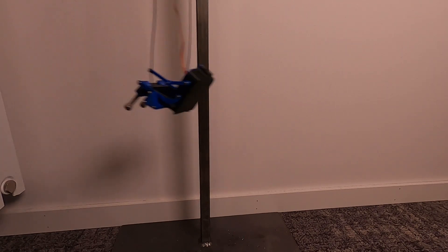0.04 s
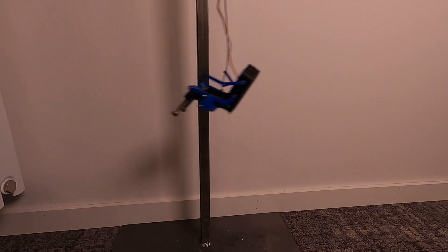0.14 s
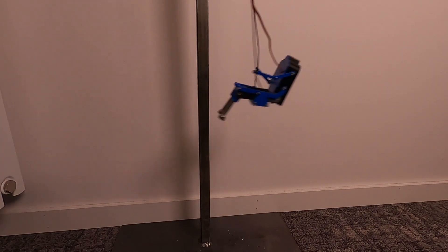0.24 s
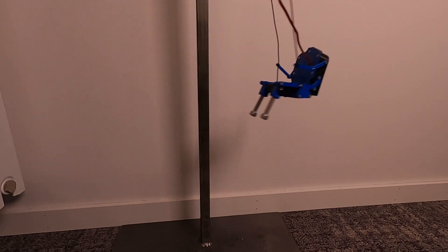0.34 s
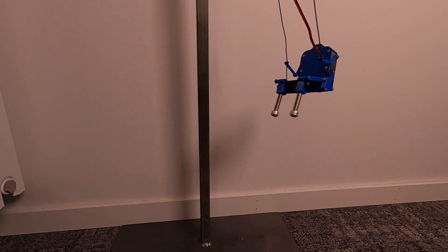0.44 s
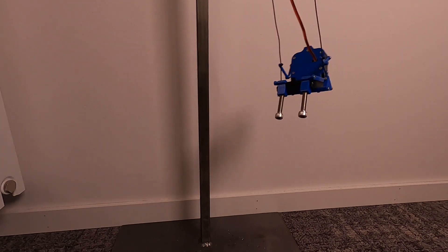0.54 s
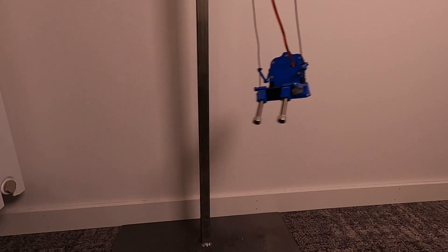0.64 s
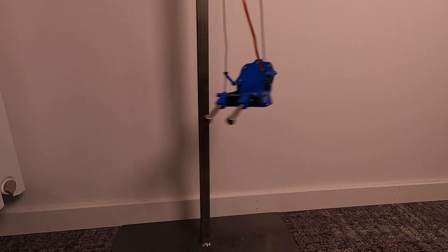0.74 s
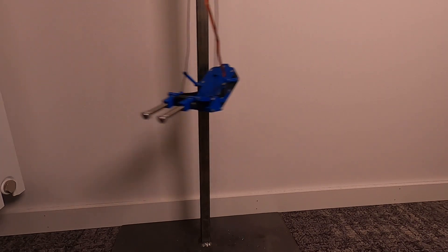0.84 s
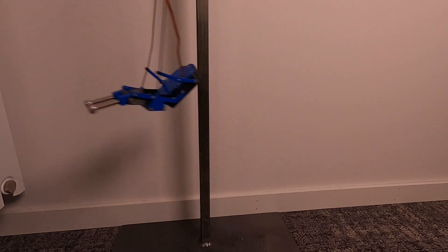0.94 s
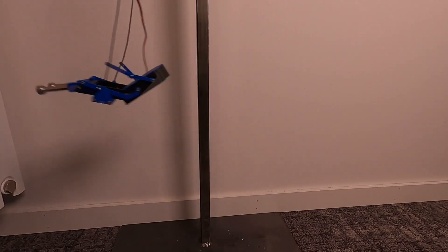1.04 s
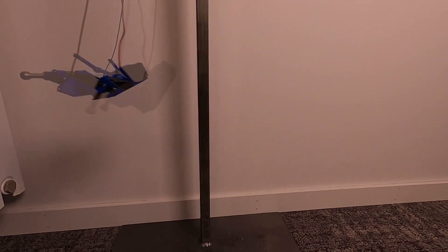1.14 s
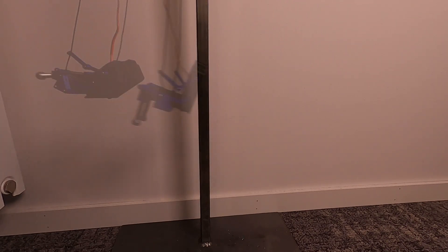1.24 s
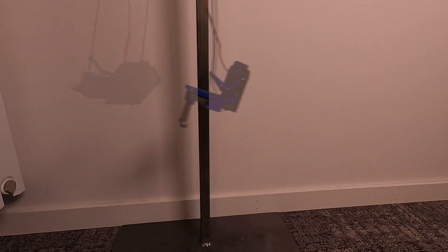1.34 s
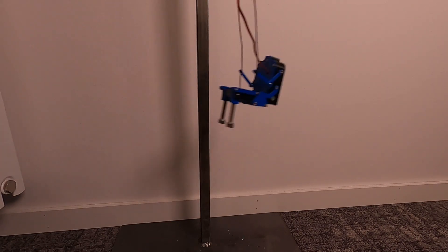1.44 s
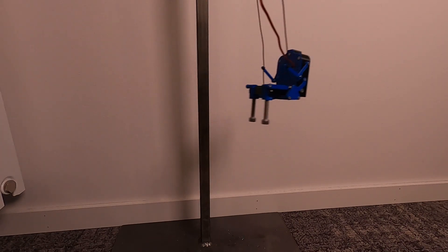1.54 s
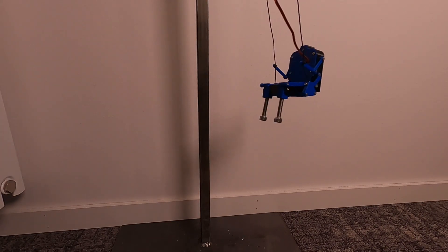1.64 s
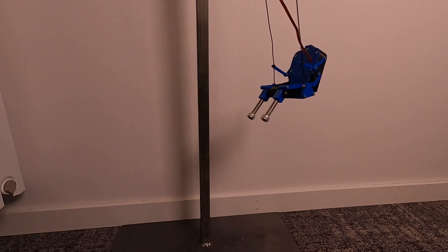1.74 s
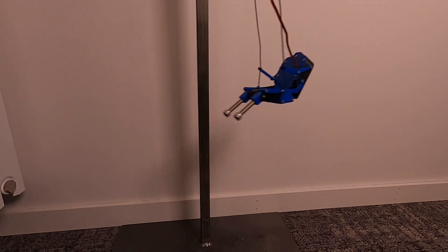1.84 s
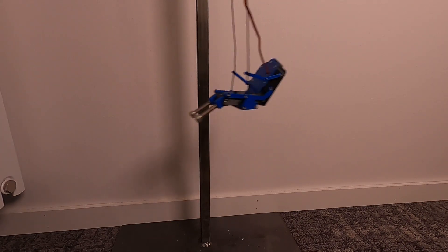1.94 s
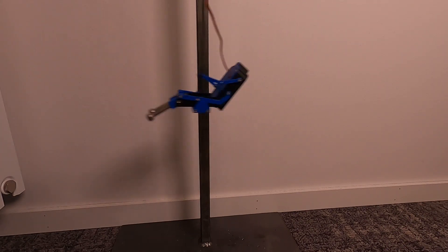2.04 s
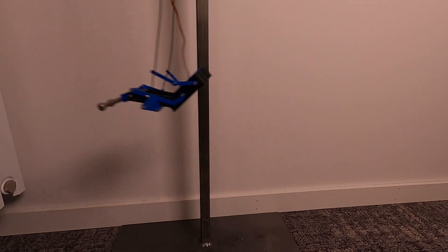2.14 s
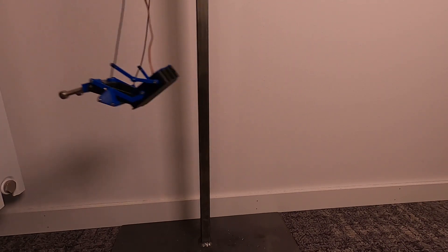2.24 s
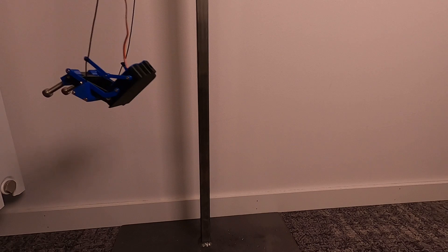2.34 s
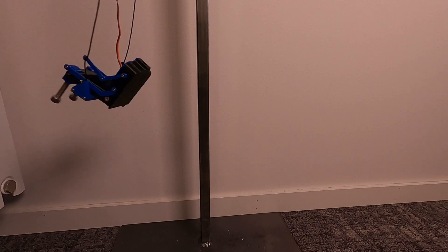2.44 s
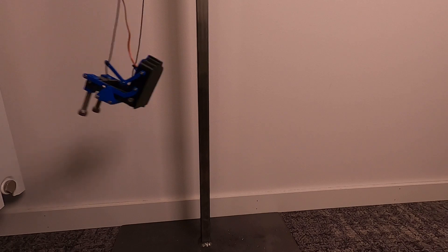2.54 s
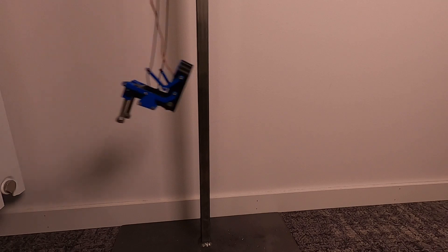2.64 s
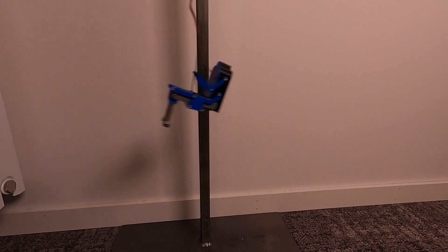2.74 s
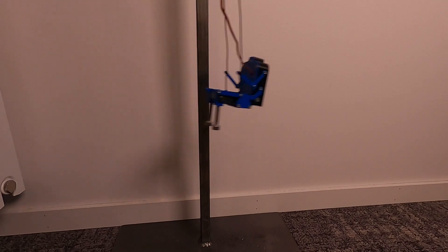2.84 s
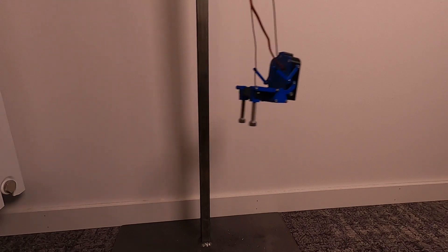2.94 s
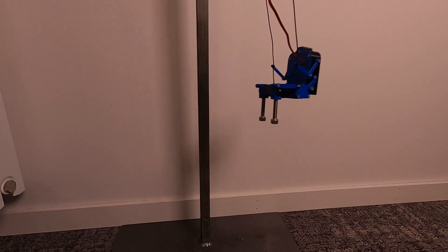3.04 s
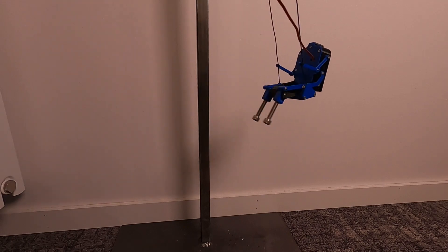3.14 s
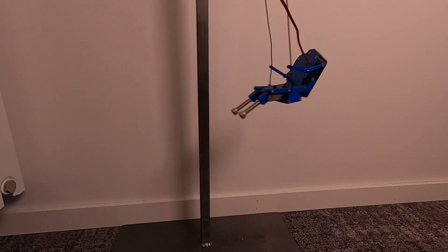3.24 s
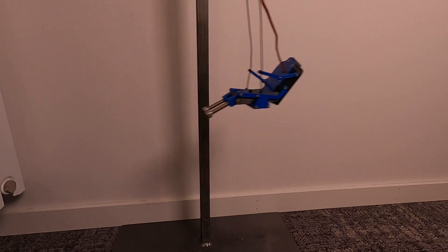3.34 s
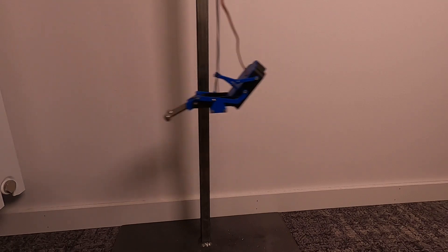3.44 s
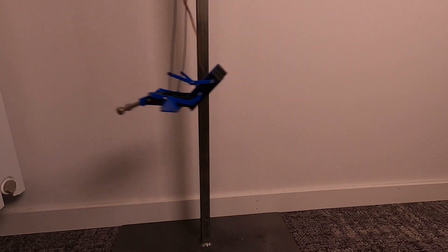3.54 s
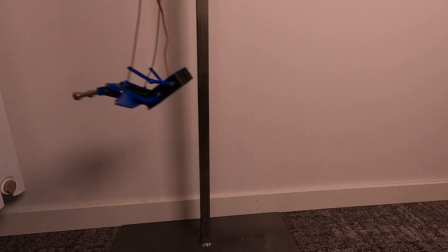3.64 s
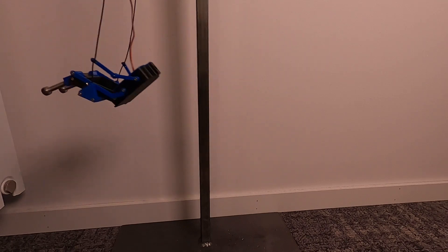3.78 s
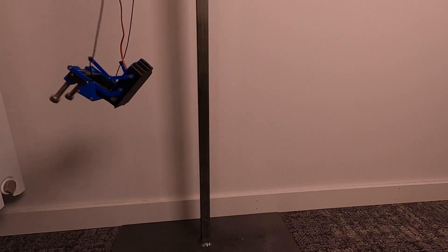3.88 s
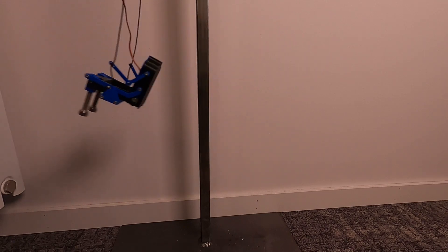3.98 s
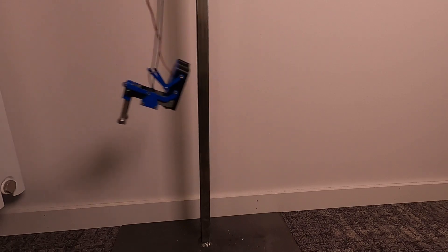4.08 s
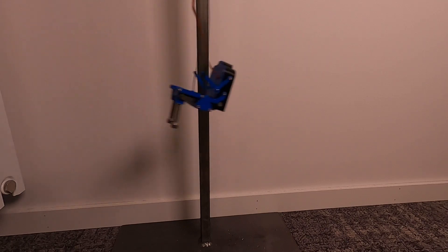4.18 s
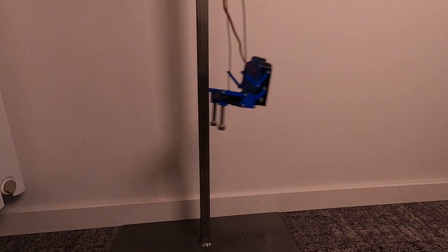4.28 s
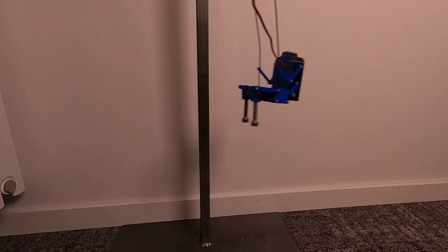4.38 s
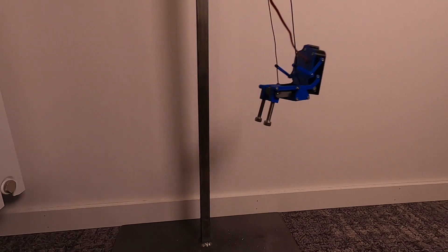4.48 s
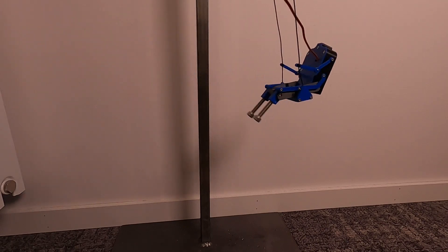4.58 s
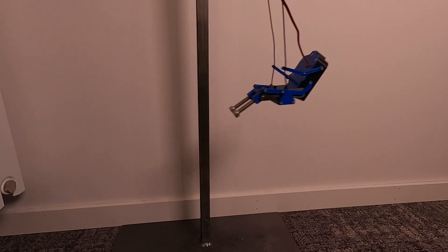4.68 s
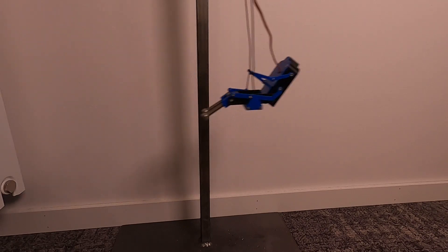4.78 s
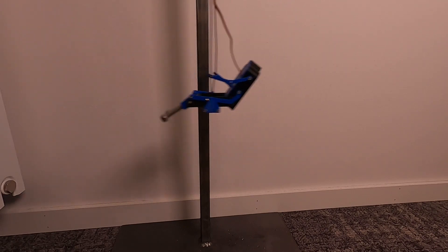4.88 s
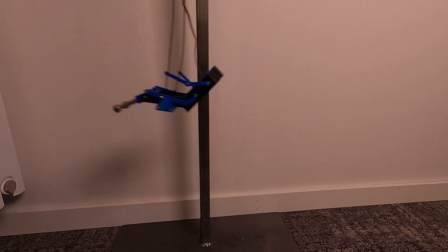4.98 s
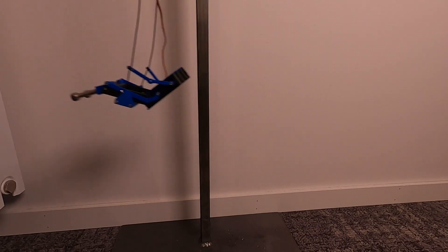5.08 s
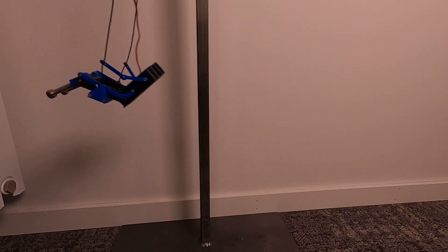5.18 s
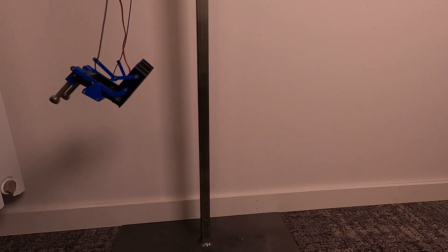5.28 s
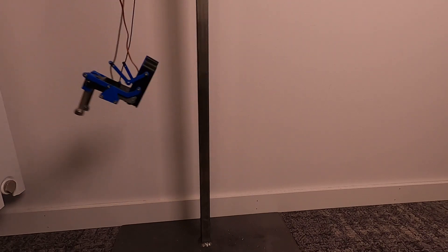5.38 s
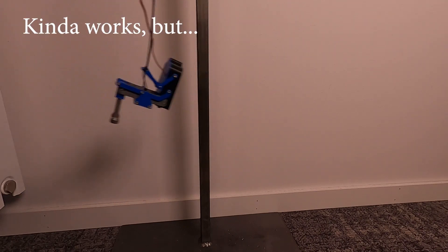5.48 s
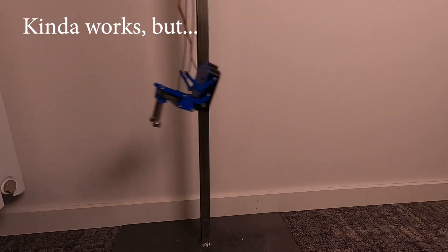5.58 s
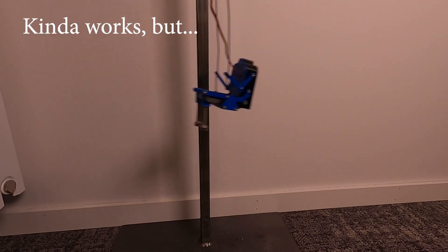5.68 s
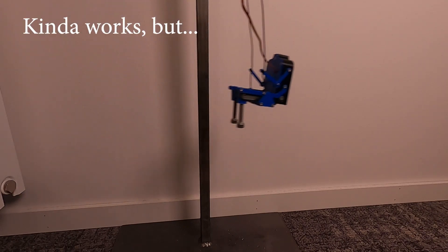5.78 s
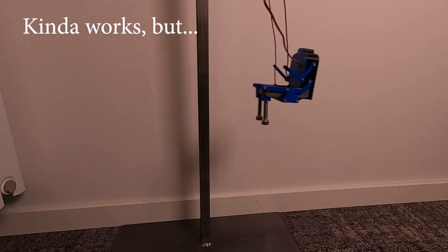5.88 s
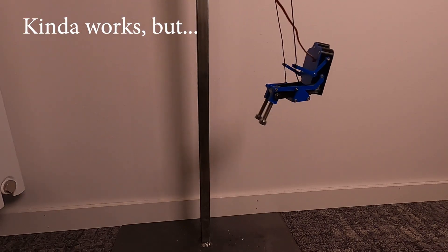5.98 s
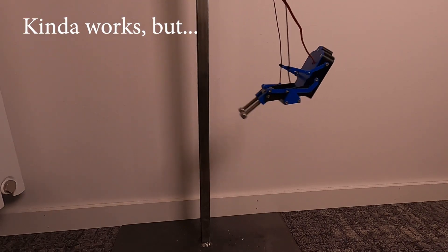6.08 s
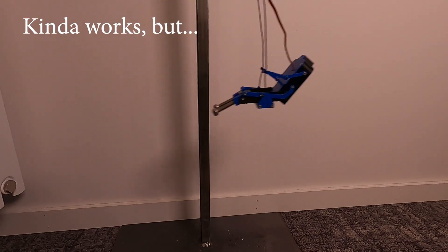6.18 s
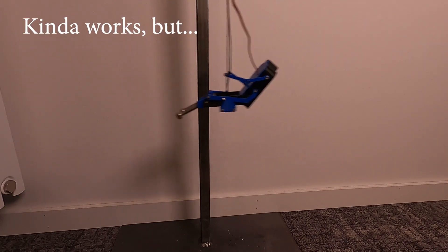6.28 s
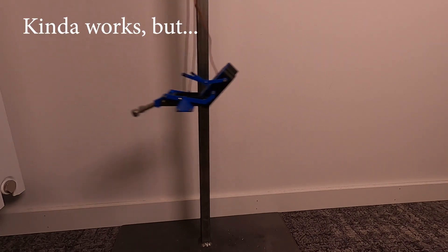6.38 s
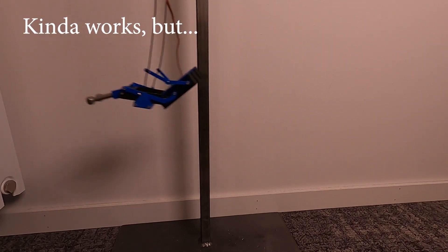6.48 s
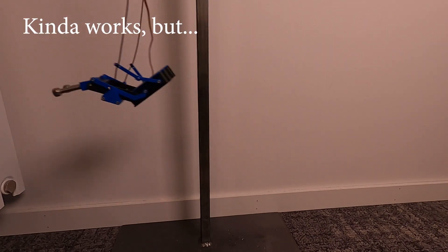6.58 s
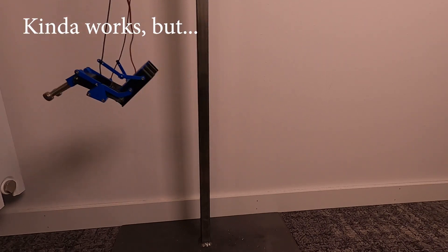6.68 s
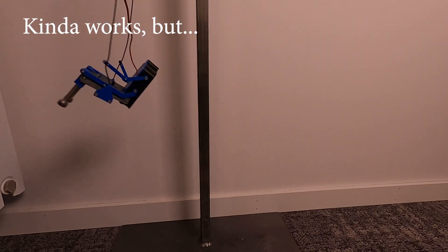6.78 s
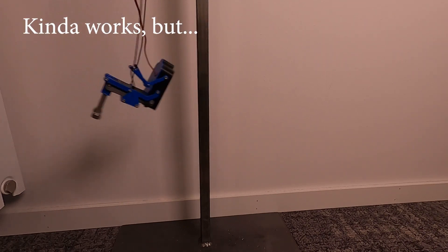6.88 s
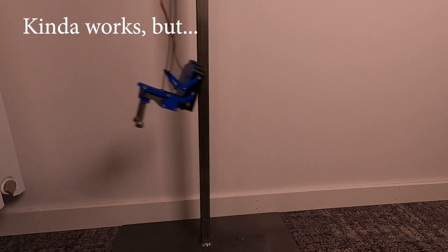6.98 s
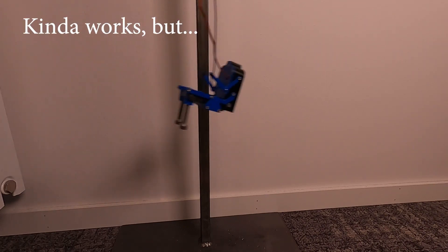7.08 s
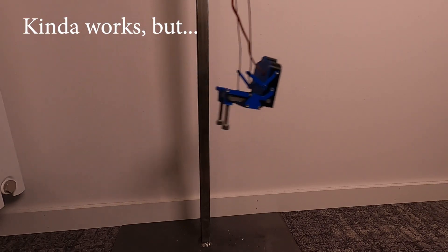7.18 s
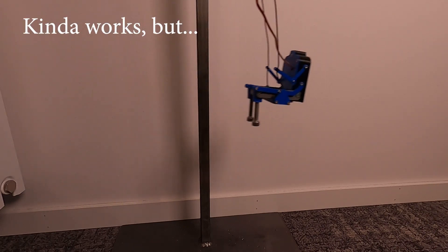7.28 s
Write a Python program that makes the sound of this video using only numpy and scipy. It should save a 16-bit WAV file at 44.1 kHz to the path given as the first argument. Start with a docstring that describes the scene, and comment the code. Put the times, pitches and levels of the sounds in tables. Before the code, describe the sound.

In a quiet room with bare walls, a small geared motor rasps briefly back and forth. Lower, growling strokes alternate with brighter, slightly louder ones, each led by a few sharp kicks. Early pauses hold single clicks; later ones mosthold dry ticking at fifty a second. Faint bass murmur, a few dull booms and soft hiss sit underneath, heard closely in stereo with little reverberation.

```python
"""Short gear rattles, flurries of ticks and single snaps in a quiet room, over low rumble and swelling hiss.
A hobby servo leans a small plastic robot back and sits it up again on a string swing.
Strokes are trains of tooth contacts ringing in the case; in stretches of holding, a kick each 20 ms frame ticks.
Rumble, hum, hiss and room tone are filtered noise; booms and frame knocks are shaped low sines."""
import sys
import numpy as np
from scipy import signal
from scipy.fft import rfft, irfft
from scipy.io import wavfile
from scipy.ndimage import uniform_filter1d

SR = 44100
rng = np.random.default_rng(int(sys.argv[2]) if len(sys.argv) > 2 else 0)


def wav_record(signal):
    """Record a signal, one row per channel, as 16-bit PCM in the file named by sys.argv[1]."""
    frames = np.transpose(np.atleast_2d(signal))
    bounded = np.clip(frames, -1, 1)
    # unit amplitude maps onto the largest positive 16-bit level
    quanta = np.round(bounded * 32767).astype(np.int16)
    wavfile.write(sys.argv[1], SR, quanta)


N = 322812
TIME = np.arange(N) / SR
FRAME_S = .02002   # spacing of the servo's control pulses

# colour of one kick in the gears, before the case resonances and bass cut: (f/Hz, relative level/dB)
TICK_COLOUR = [(600, -31), (1100, -21), (1400, -4.5), (1780, 1), (2300, -14.5), (2750, -10.5), (3400, -7.5),
               (4200, -9.5), (5000, -4), (5900, -12), (7000, -16), (8400, -10.5), (11000, -28),
               (15500, -42)]


def from_db(db):
    """Amplitude factor of a level in dB."""
    return 10 ** (np.asarray(db) / 20)


def rms_one(x):
    """Scale a sound to an RMS of 1."""
    return x / np.sqrt(np.mean(x ** 2) + 1e-20)


def at_hz(points, hz):
    """Read a curve of (f/Hz, value) along a logarithmic frequency axis."""
    points = np.array(points)
    return np.interp(np.log(hz + 1), np.log(points[:, 0]), points[:, 1])


def butter(x, edge_hz, kind, order=2):
    """Butterworth filter."""
    sos = signal.butter(order, edge_hz, kind, fs=SR, output="sos")
    return signal.sosfilt(sos, x)


def band(x, centre_hz, width_hz, order=2):
    """Keep a band around a centre frequency."""
    return butter(x, [centre_hz - width_hz / 2, centre_hz + width_hz / 2], "band", order)


def add(out, start_s, sound):
    """Mix a sound into every channel at its time."""
    at = max(0, round(start_s * SR))
    out[:, at:at + sound.shape[1]] += sound[:, :N - at]


def drift(t, rate):
    """Random wander around 0: straight lines between normal draws, `rate` of them a second."""
    knots = np.arange(t[0], t[-1] + 2 / rate, 1 / rate)
    return np.interp(t, knots, rng.standard_normal(len(knots)))


def swells(rows):
    """Gain that rises and falls in a bell around each row's time."""
    return sum(from_db(db) * np.exp(-((TIME - s) / half_s) ** 2) for s, db, half_s in rows)


def air(colour):
    """Steady stereo noise of RMS 1, whose likeness between the ears depends on frequency."""
    # likeness of the background in both ears: (f/Hz, likeness/0-1)
    likeness = [(60, 0.82), (150, 0.79), (300, 0.2), (700, 0.07), (2000, 0.54), (6000, 0), (14000, 0)]
    hz = np.fft.rfftfreq(N, 1 / SR)
    mid, side = rfft(rng.standard_normal((2, N))) * from_db(at_hz(colour, hz))
    alike = at_hz(likeness, hz)
    spectrum = np.sqrt(1 + alike) * mid + np.sqrt(1 - alike) * side * [[1], [-1]]
    return rms_one(irfft(spectrum, N))


def room_tone(level_db=-64.5):
    """Steady background noise of the room, weighted to the bass."""
    # spectrum of the room tone: (f/Hz, relative density/dB per Hz)
    tone_colour = [(15, -17), (30, -8), (50, -20.5), (105, -17.5), (165, -14), (230, -24), (420, -25.5),
                   (550, -31.5), (850, -37.5), (1200, -32.5), (1900, -32.5), (2400, -41.5), (7000, -53),
                   (15000, -78)]
    return from_db(level_db) * air(tone_colour)


def hum(hz=397, width_hz=25, level_db=-82):
    """A faint wavering hum: a narrow band of noise, independent in each ear."""
    noise = rng.standard_normal((2, N))
    return from_db(level_db) * rms_one(band(noise, hz, width_hz))


def rumble(hz=68, width_hz=30, gain_db=1, boom_hz=66, uneven_db=3, uneven_per_s=14):
    """A low resonance of the room murmurs unevenly as narrow noise and now and then booms as a wavering sine."""
    # murmur level before gain and unevenness: (t/s, level/dB)
    murmur_levels = [(0, -76), (1.9, -72), (2.6, -63), (4.2, -67), (5.8, -64.5), (7.3, -67)]
    # soft low booms: (peak t/s, peak level/dB, half length to 1/e /s)
    boom_rows = [(0.349, -48, 0.015), (1.561, -46.5, 0.021), (2.431, -49, 0.028), (2.833, -44, 0.011),
                 (2.893, -41, 0.036), (3.014, -48.5, 0.02)]
    murmur = rms_one(band(rng.standard_normal(N), hz, width_hz))
    murmur_db = np.interp(TIME, *np.transpose(murmur_levels)) + gain_db + uneven_db * drift(TIME, uneven_per_s)
    boom_pitch = boom_hz * (1 + 0.029 * drift(TIME, 11))
    booms = swells(boom_rows) * np.sin(2 * np.pi * np.cumsum(boom_pitch) / SR)
    return murmur * from_db(murmur_db) + booms


def hiss():
    """Soft coloured noise that swells and fades."""
    # colour of the hiss: (f/Hz, relative level/dB)
    hiss_colour = [(250, -3.5), (600, -7), (1200, 3), (2400, -1.5), (4800, -5), (8500, -10.5), (12000, -26),
                   (15500, -32)]
    # swells of the hiss: (peak t/s, peak level/dB, half length to 1/e /s)
    hiss_swells = [(0, -67, 0.063), (4.25, -57.5, 0.48), (5.1, -72.5, 0.6)]
    return swells(hiss_swells) * air(hiss_colour)


def room(x, wet_db=-17, t60_s=0.28, dull_hz=7000, build_s=0.0074):
    """Bare walls over carpet add a short diffuse tail: dulled, decaying noise convolved with the sound."""
    t = TIME[:SR // 2]
    envelope = from_db(-60 * t / t60_s) * (1 - np.exp(-t / build_s))
    tail = butter(rng.standard_normal((2, len(t))) * envelope, dull_hz, "low", order=1)
    tail /= np.linalg.norm(tail, axis=1, keepdims=True)
    return x + from_db(wet_db) * signal.fftconvolve(x, tail, axes=1)[:, :N]


def to_ears(x, pan_db, lag_s, scatter_db=-6, scatter_s=0.0025, scatter_hz=3000, wall_s=.0039, wall_db=-13):
    """Direct sound, the wall close behind, and treble scattered by nearby parts, drawn afresh at each call."""
    t = TIME[:SR // 40]
    scatter = rng.standard_normal((2, len(t))) * np.exp(-t / scatter_s) * (t > .0006)
    scatter = butter(scatter, scatter_hz, "high", order=1)
    paths = from_db(scatter_db) * scatter / np.linalg.norm(scatter, axis=1, keepdims=True)
    paths[:, 0] += 1   # direct sound
    paths[:, round(wall_s * rng.uniform(.95, 1.05) * SR)] += from_db(wall_db)
    paths /= np.sqrt(np.sum(paths ** 2) / 2)
    left, right = signal.fftconvolve(x[None], paths, axes=1)[:, :len(x)]
    # the left path is a little longer
    delay = np.exp(-2j * np.pi * np.fft.rfftfreq(len(x), 1 / SR) * lag_s)
    left = irfft(rfft(left) * delay, len(x))
    return np.array([left * from_db(pan_db / 2), right * from_db(-pan_db / 2)])


def knocks():
    """A jolt of the servo passes up the strings and sets the frame ringing: dull decaying sines."""
    # knocks of the swing frame: (t/s, level/dB, f/Hz, decay to 1/e /s)
    knock_rows = [(1.2395, -58, 420, .003), (3.106, -56, 285, .025)]
    out, t = np.zeros((2, N)), TIME[:SR // 4]
    for s, db, hz, decay_s in knock_rows:
        ring = np.sin(2 * np.pi * hz * t) * np.exp(-t / decay_s)
        add(out, s, from_db(db) * ring[None])
    return out


def body(colour, size=4096):
    """Causal, minimum-phase ring of the servo case to one contact, of unit energy."""
    # sharp resonances of the case and frame: (f/Hz, width/Hz, lift/dB)
    resonances = [(1680, 69, 5.5), (1908, 108, 9), (2702, 170, 6), (4670, 180, 2), (6100, 87, 4),
                  (8150, 210, 1), (9790, 380, 3)]
    hz = np.fft.rfftfreq(size, 1 / SR)
    db = at_hz(colour, hz)
    for centre, width, lift in resonances:
        db = db + lift / (1 + (2 * (hz - centre) / width) ** 2)
    # folding the cepstrum puts the energy as early as possible
    cepstrum = irfft(np.log(from_db(db)))
    cepstrum[1:size // 2] *= 2
    cepstrum[size // 2 + 1:] = 0
    ring = irfft(np.exp(rfft(cepstrum)))
    ring = butter(ring, 700, "high", order=4)   # so small a case radiates no bass
    return ring / np.linalg.norm(ring)


def tick(ring, treble_db, length_s, rattle_db=-6, rise_s=0.00055, chatter_db=-16, chatter_s=0.023,
         split_hz=2500, scrape_gain_db=2):
    """One drive pulse shoves the gears across their backlash: a soft knock, then a brief rattle; peak about 1."""
    t = TIME[:SR // 20]
    decay = np.exp(-t / length_s) + from_db(chatter_db) * np.exp(-t / chatter_s)
    shape = (1 - np.exp(-(t / rise_s) ** 2)) * decay
    scrape = rng.standard_normal(len(t)) * shape
    rattle = signal.fftconvolve(scrape, ring)[:len(t)] / np.linalg.norm(shape)
    knock = ring[:len(t)]
    case = butter(knock + from_db(rattle_db) * rattle, split_hz, "low", order=4)
    case /= np.hypot(1, from_db(rattle_db))
    sound = case + from_db(treble_db + scrape_gain_db) * butter(rattle, split_hz, "high", order=4)
    loudest = np.sqrt(uniform_filter1d(sound ** 2, SR // 300).max())   # highest short-term RMS
    return sound / loudest / 2


def holding(gain_db=4, uneven_db=1.2, pan_db=1, alternate_db=1.0):
    """Under load the motor gets a kick in every control frame: a 50 Hz ticking, alternately brighter and duller."""
    # stretches of holding; levels before gain, treble before the tick's scrape gain:
    # (first pulse t/s, last pulse t/s, first level/dB, last level/dB, treble/dB, rattle re knock/dB, rattle decay/s)
    hold_rows = [(1.2709, 1.5712, -44.5, -45, -11.5, -6.5, 0.002),
                 (2.612, 2.653, -49.5, -51.5, -6, 0, 0.0019), (4.075, 4.457, -48, -49, 0, 1, 0.0021),
                 (4.796, 4.937, -49.5, -53, -3.5, -1, 0.002), (5.518, 5.899, -45, -52, 7, -9, 0.0023),
                 (6.317, 6.441, -48.5, -51, -3.5, -2.5, 0.0018),
                 (6.981, 7.302, -42.5, -54.5, 5, -2, 0.0032)]
    out, ring = np.zeros((2, N)), body(TICK_COLOUR)
    for first, last, first_db, last_db, treble_db, rattle_db, length_s in hold_rows:
        count = max(1, round((last - first) / FRAME_S) + 1)
        levels = np.linspace(first_db, last_db, count)
        train = np.zeros(round((count * FRAME_S + .1) * SR))
        for k, db in enumerate(levels):
            bright_db = treble_db + alternate_db * (-1) ** k + rng.normal(0, 0.845)
            kick = tick(ring, bright_db, length_s, rattle_db, chatter_db=-18.0)
            at = round(k * FRAME_S * SR)
            train[at:at + len(kick)] += from_db(db + gain_db + rng.normal(0, uneven_db)) * kick
        add(out, first, to_ears(train, pan_db, lag_s=3e-5, wall_db=-9.5))
    return out


def twitches(kicks, gain_db, top_db, length_s, pan_db, treble_gain_db=-3, top_hz=7000):
    """Kicks of the unloaded motor, with a harder, brighter snap."""
    out, ring = np.zeros((2, N)), body(TICK_COLOUR)
    ring = ring + (from_db(top_db) - 1) * butter(ring, top_hz, "high", order=1)
    for s, db, treble_db in kicks:
        kick = tick(ring, treble_db + treble_gain_db, length_s, rattle_db=1.0, rise_s=0.0011, chatter_db=-12.5)
        add(out, s, to_ears(from_db(db + gain_db) * kick, pan_db, lag_s=3e-5))
    return out


def corrections(rebound_db=-8.5):
    """Lone corrections of the servo: single snaps, each with one softer rebound."""
    # corrections, before the gains in twitches and tick: (t/s, level/dB, treble/dB, rebound after/s)
    correction_rows = [(0.4741, -50.5, 6, .011), (0.533, -48, 0, 0.0074), (0.572, -42.5, -11.5, 0.0061),
                       (0.9921, -42, -11.5, 0.014), (1.2394, -36.5, 2, 0.011), (1.8927, -36, -21, 0.03),
                       (2.2318, -42, 7, .0174)]
    kicks = []
    for s, db, treble_db, rebound_s in correction_rows:
        kicks.append((s, db, treble_db))
        kicks.append((s + rebound_s, db + rebound_db, treble_db))
    return twitches(kicks, gain_db=-0.1, top_db=10, length_s=0.0017, pan_db=-1.2)


def lead_in(rows, take_up_db=-35.5, take_up_treble_db=-12.5):
    """Kicks in the control frames before each stroke, then one as the gears take up their backlash and it starts."""
    kicks = []
    for start_s, *_, count, last_db, growth_db, treble_db in rows:
        for k in range(round(count)):   # from the last kick backwards
            kicks.append((start_s - (k + 1) * FRAME_S, last_db - k * growth_db, treble_db))
        kicks.append((start_s, take_up_db, take_up_treble_db))
    return kicks


def motor_speed(t, driven_s, run_up_s, coast_s, start_speed=.33):
    """Share of full speed: the motor runs up under drive, then friction brakes it evenly."""
    run_up = 1 - (1 - start_speed) * np.exp(-t / run_up_s)
    return run_up * np.clip((driven_s + coast_s - t) / coast_s, .02, 1)


def teeth(t, speed, mesh_hz=901.5, jitter=.2, uneven_db=3.0, bounce_per_s=3500, bounce_db=-6, slide_db=-17,
          waver_db=1.0, waver_per_s=230):
    """Teeth meet at an uneven pace, bounce in their backlash and slide, and their force wavers quickly at random."""
    contact_rate = mesh_hz * speed * (1 + jitter * drift(t, mesh_hz))
    contacts = np.cumsum(contact_rate) / SR
    meets = np.diff(np.floor(contacts), prepend=0)   # an impulse at each whole count
    bounces = (rng.random(len(t)) < bounce_per_s * speed / SR) * rng.choice([-1, 1], len(t))
    sizes = from_db(uneven_db * np.clip(rng.standard_normal(len(t)), -2, 2))
    slide = from_db(slide_db) * rng.standard_normal(len(t))
    force = (meets + from_db(bounce_db) * bounces) * sizes + slide
    force *= from_db(waver_db * np.clip(drift(t, waver_per_s), -2, 2))
    # the motor's torque keeps the mean force steady
    return force / np.sqrt(uniform_filter1d(force ** 2, SR // 40))


def strokes(rows, colour, pan_db, lag_s, climb_db, arch_db, growl_arch_db, ring_sag_db,
            rasp_power=0.92, ring_power=1.52, pace_power=.45, split_hz=2400, growl_hz=1005, growl_width_hz=268,
            flutter_db=0.92, flutter_per_s=70, ring_flutter_db=1.53, throb_db=1.0, wheel_hz=39):
    """The gear train runs up and down: teeth rasp, the case rings lower, and a throbbing growl peaks in mid-stroke."""
    out, ring = np.zeros((2, N)), body(colour)
    for start_s, driven_s, run_up_s, coast_s, rasp_db, ring_db, growl_db, *_ in rows:
        t = np.arange(0, driven_s + coast_s, 1 / SR)
        speed = motor_speed(t, driven_s, run_up_s, coast_s)
        pace = speed ** pace_power
        travel = np.minimum(2 * t / driven_s - 1, 1)   # -1 at the start, 0 in mid-stroke, 1 at the end
        rattle = signal.fftconvolve(teeth(t, pace), ring)[:len(t)]

        rasp = rms_one(butter(rattle, split_hz, "high", order=6))
        rasp *= speed ** rasp_power * from_db(climb_db * travel - arch_db * travel ** 2)

        case_db = ring_db - ring_sag_db * travel + ring_flutter_db * drift(t, flutter_per_s)
        case = rms_one(butter(rattle, split_hz, "low", order=6)) * from_db(case_db)

        growl = band(teeth(t, pace, jitter=.7), growl_hz, growl_width_hz, order=4)
        wheel_turns = np.cumsum(wheel_hz * speed) / SR + rng.random()
        throb = throb_db * np.sin(2 * np.pi * wheel_turns)   # once in each turn of a wheel
        growl = rms_one(growl) * from_db(growl_db + throb - growl_arch_db * travel ** 2)

        flutter = flutter_db * drift(t, flutter_per_s)   # the slow wheels bind and free unevenly
        level = from_db(rasp_db + flutter) * signal.windows.tukey(len(t), .02)
        add(out, start_s, to_ears(level * speed ** ring_power * (case + growl), pan_db, lag_s))
        add(out, start_s, to_ears(level * rasp, pan_db, lag_s))
    return out


def leaning_back():
    """The servo leans the robot back, its teeth bearing on one flank."""
    # strokes; levels before the shaping in strokes, kicks before the gains in twitches and tick:
    # (start t/s, driven/s, run-up/s, coast/s, rasp level/dB, case ring re rasp/dB, growl re rasp/dB,
    #  kicks before the start/count, last kick level/dB, growth per kick/dB, kick treble/dB)
    back_rows = [(2.3124, 0.25, .025, .037, -33.5, -2, -30, 2, -35.5, 4.7, 4.2),
                 (3.775, 0.24, .015, .033, -33, -1.8, -25.5, 2, -36.5, 10.5, 9),
                 (5.2176, 0.2, .02, 0.066, -33.5, -1.5, -24.5, 2, -35, 12, 8.2),
                 (6.641, .27, .02, 0.064, -34.5, -1, -24.5, 3, -36.5, 6.9, 1.4)]
    # colour of the tooth contacts on this flank: (f/Hz, relative level/dB)
    back_colour = [(590, -50.5), (1000, -30.5), (1120, -27.5), (1330, -5), (1820, -2.5), (2420, -4.5),
                   (2770, -9), (3960, -14), (4870, -6.5), (6120, -9), (7030, -14.5), (8340, -5),
                   (9150, -16), (12500, -26.5), (15500, -39)]
    gears = strokes(back_rows, back_colour, pan_db=0.3, lag_s=1e-5, climb_db=1.1, arch_db=1.0,
                    growl_arch_db=3.5, ring_sag_db=0.8)
    return gears + twitches(lead_in(back_rows), gain_db=.8, top_db=7, length_s=0.0014, pan_db=-0.5)


def sitting_up():
    """The servo sits the robot up, its teeth bearing on the other flank."""
    # strokes; levels before the shaping in strokes, kicks before the gains in twitches and tick:
    # (start t/s, driven/s, run-up/s, coast/s, rasp level/dB, case ring re rasp/dB, growl re rasp/dB,
    #  kicks before the start/count, last kick level/dB, growth per kick/dB, kick treble/dB)
    up_rows = [(0.6522, 0.19, .034, 0.045, -35.5, 3, -19, 2, -37.5, 3, -4.5),
               (1.6735, .2, .018, 0.015, -36, 3, -13, 2, -39, 12, 6),
               (3.1165, 0.19, .014, 0.049, -35, 1.5, -14, 2, -34.5, 6.5, -4.5),
               (4.5195, 0.19, .02, .06, -35.5, 1, -13.5, 1, -33.5, 0, 0),
               (5.9612, 0.27, 0.034, 0.061, -36, 2, -16.5, 1, -36.5, 0, 6)]
    # colour of the tooth contacts on this flank: (f/Hz, relative level/dB)
    up_colour = [(590, -46), (1000, -22), (1120, -34.5), (1290, -8), (1410, -10.5), (1580, -2.5),
                 (1840, -3), (2420, -10), (2710, -11.5), (4010, -13.5), (4760, -11), (7360, -20),
                 (8440, -13), (13200, -29), (15500, -44)]
    gears = strokes(up_rows, up_colour, pan_db=-1.95, lag_s=3.8e-5, climb_db=0.27, arch_db=2.2,
                    growl_arch_db=9.5, ring_sag_db=0.65)
    return gears + twitches(lead_in(up_rows), gain_db=1.4, top_db=8.0, length_s=0.001, pan_db=-2.2)


def scene():
    """The robot in its room, over the room tone, hum, rumble and hiss of the background."""
    background = room_tone() + hum() + rumble() + hiss()
    robot = knocks() + holding() + corrections() + leaning_back() + sitting_up()
    return background + room(robot)


def record(dry, cutoff_hz=15700):
    """The two microphones differ a little in colour; the top is cut steeply."""
    # tilt between the two microphones: (f/Hz, left re right/dB)
    mic_balance = [(60, 1.5), (150, 0.5), (350, -4.5), (700, -2), (1300, 2), (4500, 3), (9000, -0.5),
                   (15000, -1.5)]
    tilt_db = at_hz(mic_balance, np.fft.rfftfreq(N, 1 / SR))
    coloured = irfft(rfft(dry) * from_db(tilt_db * [[.5], [-.5]]), N)
    steep_cut = signal.ellip(10, .1, 80, cutoff_hz, fs=SR, output="sos")
    return signal.sosfilt(steep_cut, coloured)


dry = scene()
out = record(dry)
wav_record(out)
```